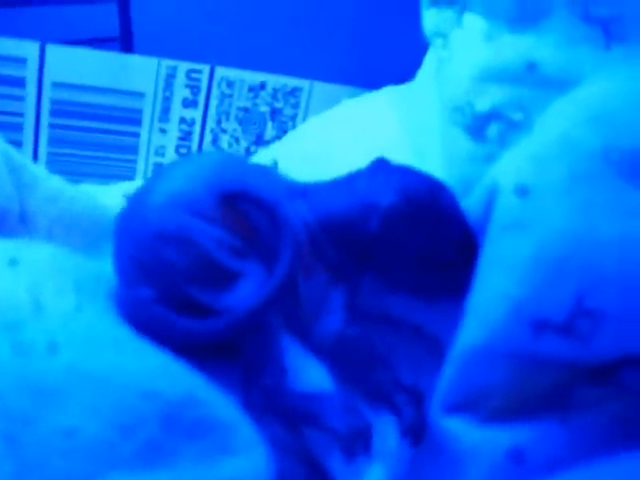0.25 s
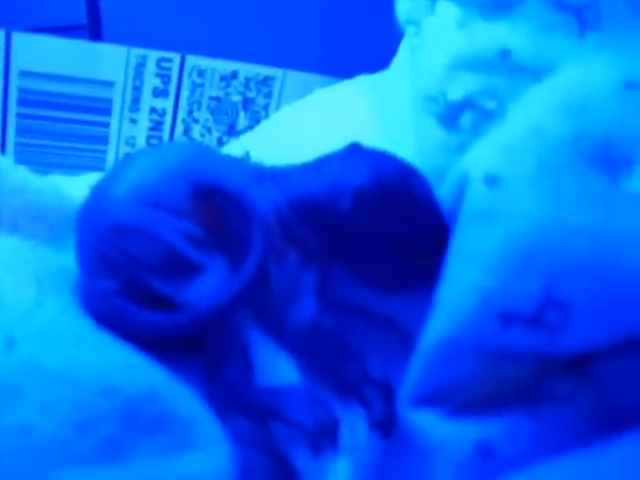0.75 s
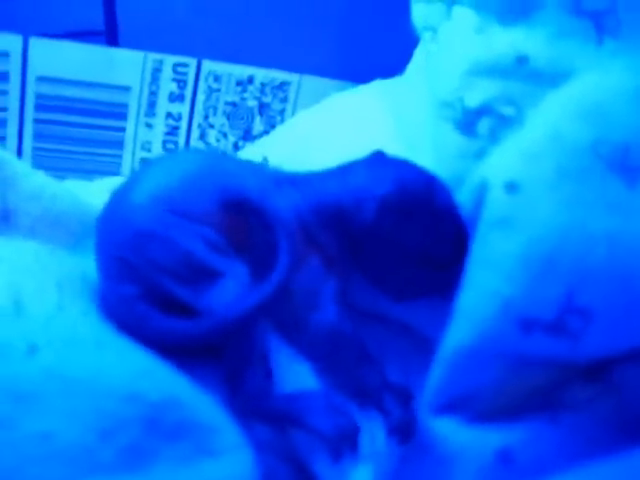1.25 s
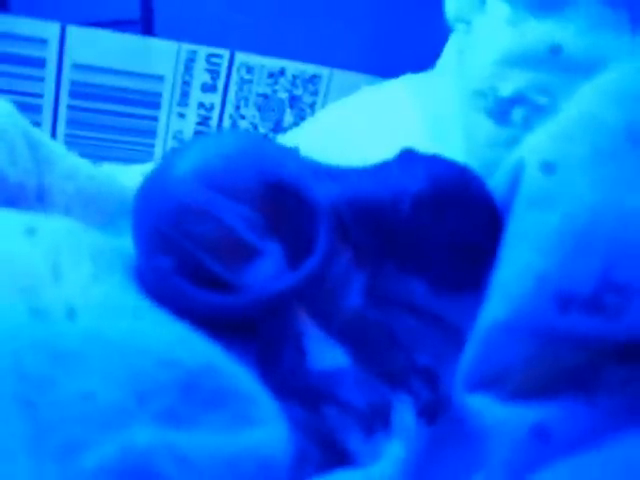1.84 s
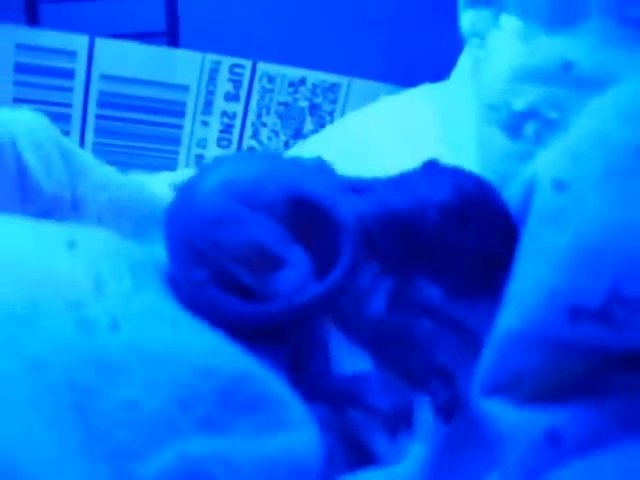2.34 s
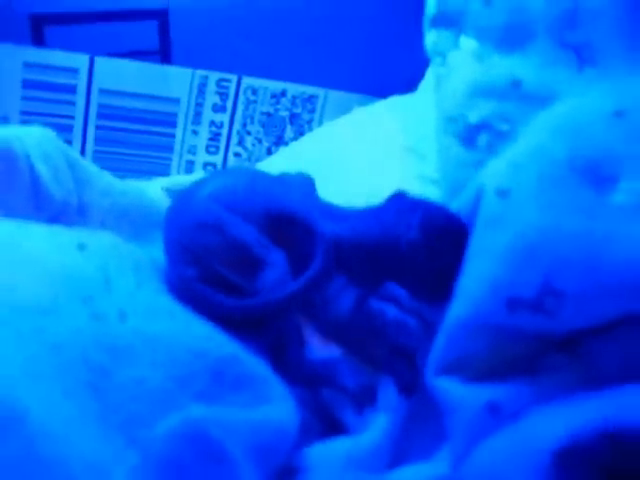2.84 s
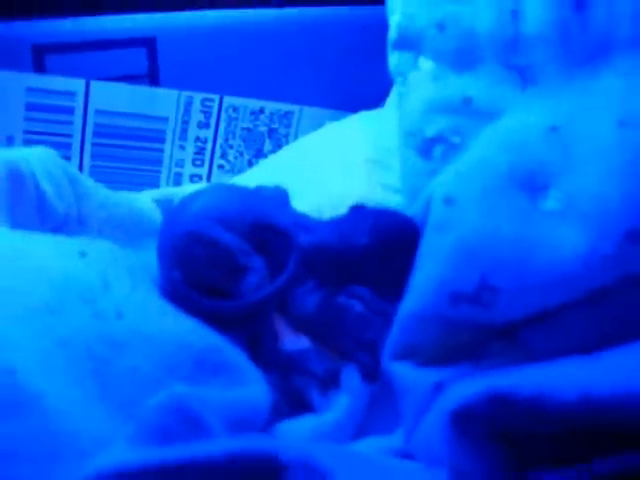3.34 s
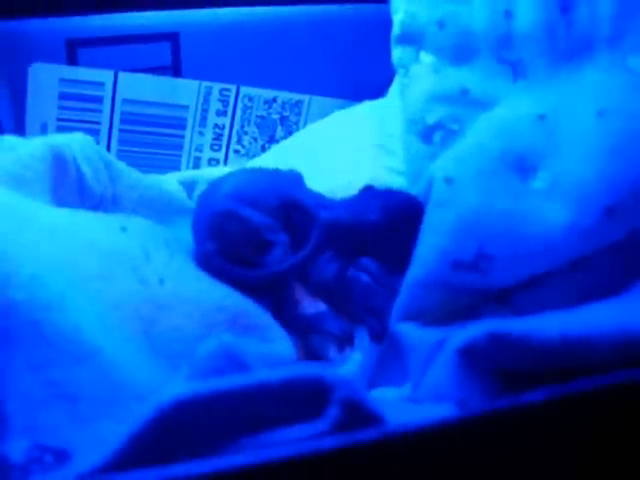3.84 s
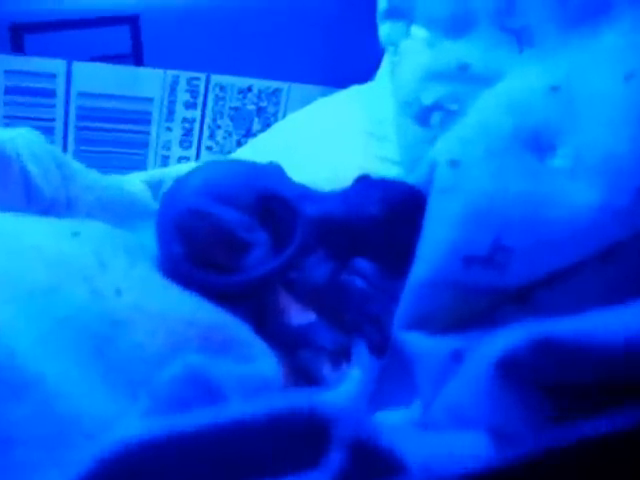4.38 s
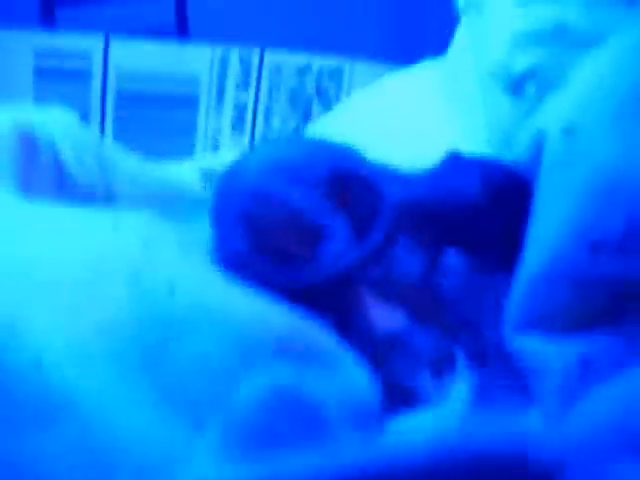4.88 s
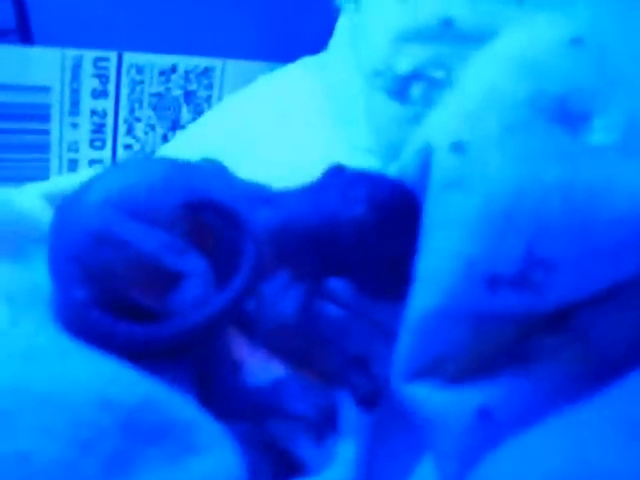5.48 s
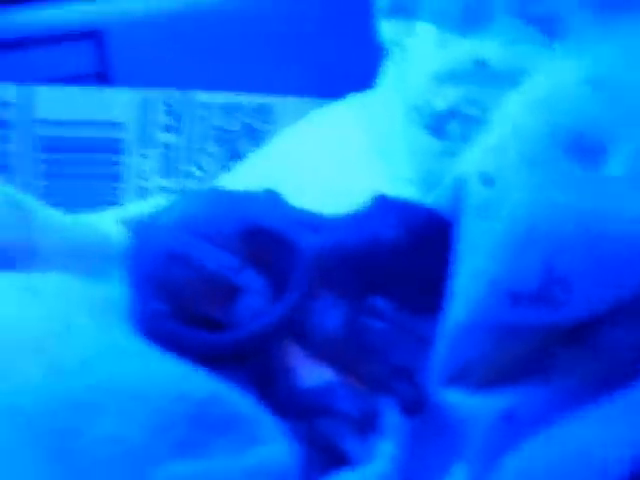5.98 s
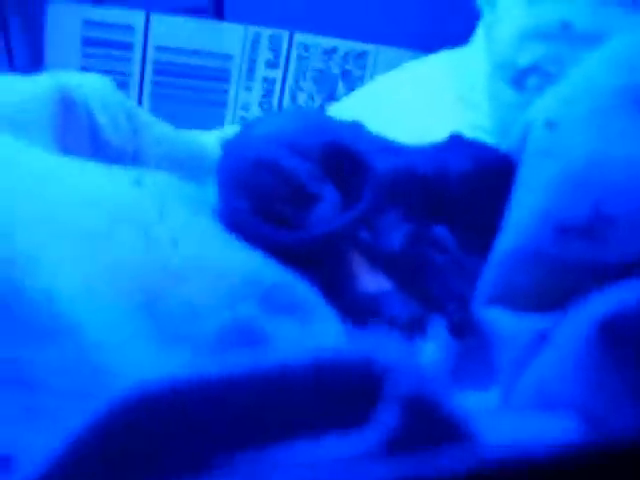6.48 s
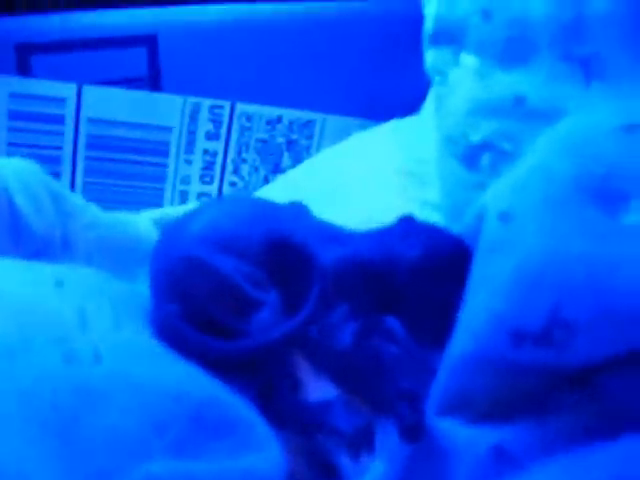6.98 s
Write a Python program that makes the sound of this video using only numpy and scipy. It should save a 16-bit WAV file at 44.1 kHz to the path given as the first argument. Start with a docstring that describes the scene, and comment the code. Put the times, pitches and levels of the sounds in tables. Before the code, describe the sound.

A baby squirrel squeaks close to the microphone in a small room with a short, faint reverberation. Twelve loud calls start at about 0.0, 0.6, 1.2, 1.8, 2.5, 3.1, 3.7, 4.3, 4.9, 5.5, 6.1 and 6.75 seconds, the last ending at 7.0. Each is a piercing whistle around 4 to 5 kHz with bright overtones, lasting 0.16 seconds at first and about 0.25 later. Pitch arches upward, then plunges at the end; a noisy rasp edges the onset and the fading tail. Later squeaks sit a little lower and flatter, with rougher endings. Small mouth ticks precede the squeaks at 0.6, 1.8 and 3.1 seconds; a soft low bump comes at 4.9, and nearly inaudible stirs at 4.1, 4.7 and 5.3. A quiet, steady appliance hum, low rumble and very faint electrical whine continue throughout.

```python
"""A baby squirrel lying in its bedding squeaks twelve times, close to one microphone in a small room.
Each squeak is a whistle near 4.5 kHz, built from four partials, that arches and drops away.
Noise and undertones between the partials make the voice rasp as it starts and as it gives out.
Bursts of filtered noise make small mouth ticks before some squeaks, and faint stirs and a bump;
behind them an appliance hums in sines and rumbles in noise."""
import sys
import numpy as np
from scipy import signal
from scipy.fft import rfft, irfft
from scipy.io import wavfile
from scipy.ndimage import uniform_filter1d, minimum_filter1d

SR = 44100
rng = np.random.default_rng(int(sys.argv[2]) if len(sys.argv) > 2 else 0)


def transcribe(signal):
    """Save signal, clipped to [-1, 1], as a 16-bit WAV file at the path in sys.argv[1]."""
    frames = np.atleast_2d(signal).T
    limited = np.clip(frames, -1, 1)
    pcm = np.round(limited * 32767).astype(np.int16)
    wavfile.write(sys.argv[1], SR, pcm)


N = 318402
TIME = np.arange(N) / SR

# The squeaks: [start t/s, end t/s, fundamental trim level/dB, swell level/dB, mouth tuning/ratio,
#   final pitch drop/fraction, opening rasp length t/s, opening rasp level/dB,
#   closing rasp length t/s, closing rasp level/dB, closing undertone level/dB]
SQUEAKS = [(0.025, 0.188, 0.5, -0.5, 1.006, 0.17, 0.0027, -17, .03, -49.5, -51),
           (.611, 0.794, -2, -1, 1.011, 0.23, 0.0047, -21, .03, -39, -49),
           (1.201, 1.407, -3, -3, 1, .38, 0.0049, -21, .049, -38, -34.5),
           (1.798, 2.02, -0.5, 1, 0.98, 0.4, 0.0073, -29, 0.06, -37.5, -33),
           (2.476, 2.689, -2.5, -3, 1.011, .38, 0.014, -19, 0.097, -30, -43),
           (3.082, 3.314, -1, -5.5, 0.99, 0.46, .011, -37, 0.059, -35.5, -19.5),
           (3.679, 3.914, -1, 3.5, 1.001, 0.22, .013, -26, 0.081, -33, -30),
           (4.304, 4.537, 2.5, 14.5, 1.027, 0.42, 0.0089, -30.5, 0.06, -31.5, -19.5),
           (4.925, 5.164, 2, 7, 1.002, 0.33, 0.024, -23.5, .051, -37, -7.5),
           (5.532, 5.777, 1, 21, 1, .47, 0.017, -24, 0.05, -29.5, -18),
           (6.137, 6.392, 2.5, 7.5, 0.98, 0.38, .034, -26, 0.063, -26.5, -14.5),
           (6.751, 7.001, 2.5, 11.5, 0.94, 0.34, 0.025, -22, .055, -28.5, -18)]
# Pitch arch of each squeak, before its final drop: [t/s, f/Hz, octave trim level/dB]
PITCH_ARCHES = [
    [(0.029, 4850, 9.5), (0.033, 4684, 6), (0.059, 4820, 8.0), (0.081, 4780, -3), (0.085, 4670, -13.5),
     (0.091, 4640, -4), (0.109, 4854, 6.5), (0.151, 4650, 3.5), (0.167, 4530, 1.0)],
    [(0.615, 4360, 1.5), (0.619, 4510, 3.5), (0.629, 4200, 7), (0.641, 4400, 10), (0.645, 4772, -5),
     (0.683, 5140, 2), (0.725, 4990, 7), (0.757, 4747, -1), (0.771, 4600, -0.5)],
    [(1.209, 4450, -2.5), (1.217, 4440, 4), (1.227, 4360, 6), (1.231, 4670, 5), (1.239, 4650, 7),
     (1.265, 5065, -6), (1.323, 5138, 5), (1.373, 4700, -4.5), (1.383, 4410, 1.5)],
    [(1.8, 4180, -5), (1.81, 3860, 0.5), (1.822, 4340, -1.5), (1.854, 4710, -0.5), (1.882, 4883, -14.5),
     (1.946, 4760, -18), (1.956, 4914, -0.5), (1.982, 4550, -3.5), (1.996, 4110, -1)],
    [(2.488, 3830, 9.5), (2.492, 4170, -0.5), (2.51, 4394, 7), (2.55, 5023, -3.5), (2.606, 4930, -6),
     (2.612, 4980, 7), (2.63, 4630, -3.5), (2.652, 4070, 1), (2.666, 3546, -1)],
    [(3.088, 3994, -3.5), (3.132, 4220, -13.5), (3.158, 4310, -9.0), (3.176, 4530, -1), (3.184, 4400, -0.5),
     (3.206, 4726, -7.5), (3.242, 4836, -7), (3.28, 4036, -6.0), (3.288, 3890, 0)],
    [(3.688, 4130, -7.5), (3.692, 4180, -4), (3.78, 4265, 1), (3.814, 4880, -6.5), (3.832, 4890, 4.5),
     (3.856, 4330, -8.0), (3.868, 4310, -9), (3.876, 4230, -1), (3.89, 3630, -1)],
    [(4.312, 4055, -0.5), (4.342, 4254, -3), (4.374, 4246, -4.5), (4.424, 4400, -1), (4.438, 4370, -6.5),
     (4.462, 4906, -1.5), (4.482, 4310, -12.5), (4.504, 4200, -5), (4.514, 3900, 2.5)],
    [(4.946, 4030, 13), (4.962, 4110, -0.5), (5.022, 4217, -5.0), (5.05, 4780, 8.5), (5.068, 4374, 0),
     (5.088, 4614, -9), (5.1, 4103, -1), (5.124, 4115, 3.0), (5.14, 3716, 3.5)],
    [(5.552, 4190, -6.0), (5.612, 4200, 6.5), (5.648, 4490, 3.5), (5.66, 4700, 0), (5.698, 4470, -4),
     (5.712, 4070, -9.5), (5.73, 4273, -1), (5.744, 4040, 2.5), (5.754, 3695, 3.5)],
    [(6.16, 4188, -3), (6.166, 4229, -7.5), (6.174, 4124, -0.5), (6.246, 4313, -0.5), (6.258, 4452, 1.5),
     (6.332, 4255, -2.5), (6.348, 4090, 5), (6.356, 4020, 3.5), (6.368, 3710, 6.5)],
    [(6.768, 3940, 5), (6.776, 4100, -3.5), (6.784, 4053, 2.5), (6.832, 4195, 2.5), (6.866, 4336, 13),
     (6.898, 4323, 13), (6.942, 4124, -4.5), (6.95, 4220, -1.5), (6.978, 3732, 7)],
]
# How loud the fundamental grows as it crosses the resonances of the mouth: [f/Hz, level/dB]
MOUTH_FUNDAMENTAL = [(2300, -34), (3600, -31), (4000, -25.5), (4250, -23), (4430, -24.5), (4630, -9),
                     (4820, -6.5), (4950, -12), (5100, -5.5)]
# The same for the octave: [f/Hz, level/dB]
MOUTH_OCTAVE = [(4600, -37), (6500, -32.5), (7500, -20), (8400, -21.5), (8720, -16.5), (9100, -19),
                (9500, -21.5), (9780, -23.5), (10050, -28), (10300, -22)]
# Moments when the voice doubles its period: [start t/s, length t/s, undertone level/dB]
DOUBLINGS = [(.105, 0.039, -36), (0.682, 0.082, -34.5), (1.317, 0.046, -30.5), (2.477, 0.017, -19),
             (4.939, .008, -21.5), (6.154, 0.019, -26), (6.765, 0.01, -18.5)]
# Resonances of throat and mouth that colour the rasp: [centre f/Hz, width f/Hz, level/dB]
THROAT_RESONANCES = [(2390, 1600, -16.5), (5800, 770, -3), (5340, 550, 3), (7600, 770, -5.5),
                     (8450, 1000, -3.5), (10100, 700, -9), (13500, 3000, -26)]
# Colour of the broad hiss riding on the voice: [f/Hz, relative level/dB per Hz]
HISS_COLOUR = [(300, -1.5), (1000, 2), (2500, 1.5), (5000, 2), (9000, 4.5), (12000, 2), (15500, 1.5)]
# Reverberation time of the room: [f/Hz, t60 t/s]
ROOM_T60 = [(500, 0.33), (4500, 0.22), (8500, 0.21), (15000, 0.16)]
# Small ticks of the mouth before some squeaks, and faint stirs and a bump:
#   [t/s, level/dB, centre f/Hz, length t/s]
TICKS_AND_STIRS = [(0.605, -27, 5590, 0.00073), (1.791, -34, 5300, 0.0014), (3.085, -30.5, 3667, 0.0077),
                   (4.096, -57, 7910, 0.004), (4.705, -56.5, 8000, 0.0042), (4.889, -30.5, 145, 0.015),
                   (4.892, -48.5, 1300, 0.025), (5.328, -57, 8800, 0.0065)]
# Appliance hum and a thin electrical whine: [f/Hz, level/dB]
HUM_TONES = [(59.2, -46.5), (166.9, -43.5), (242.2, -59.5), (317.6, -52.5), (8000, -78.5), (8032, -71)]
# Colour of the background air and rumble: [f/Hz, relative level/dB per Hz]
RUMBLE_COLOUR = [(12, -23), (20, -3), (40, -3), (60, -3), (86, -12.5), (130, -7.5), (200, -12.5),
                 (330, -13.5), (540, -21.5), (720, -27), (1220, -30), (4540, -42), (8180, -46),
                 (16000, -50)]

DROP_S, DROP_POWER = 0.03, 3   # the final fall in pitch
SWELL_S, CATCH_POWER = .065, 3.0   # how the fundamental settles, how the clean tone catches
RASP_CYCLES = 4   # in a rasp the folds repeat only every few cycles
RASP_SAG_DB = 5.0   # the closing rasp weakens by this much as the air runs out
OPENING_UNDERTONE_DB = -12.5   # relative to the opening rasp
# the closing rasp loses its undertones and stops just before the voice
UNDERTONE_FADE_S, RASP_CLEARS_S = 0.011, 0.0091
RUMBLE_DB = -40
CUTOFF_HZ = 15500


def squirrel(rasp_jitter=0.28, hiss_db=-25, effort_power=.6, grain_db=4.0):
    """Vibrating folds: a clean whistle that turns jittery and noisy where the voice breaks."""
    pitch, first, octave = voice_controls()
    pressure = pressure_rise()
    turbulence, undertone, breaking = voice_breaks()
    turbulence = pressure * turbulence
    doubling = sum(from_db(db) * gate(start, start + length, edge=.0026)
                   for start, length, db in DOUBLINGS)

    waver = .003 * drift(90)
    jitter = rasp_jitter * turbulence * drift(400)
    pitch = pitch * (1 + waver + jitter)
    phase = 2 * np.pi * np.cumsum(pitch) / SR

    # the airflow varies less than the loudness, which swells wherever a partial meets a resonance
    loudness = np.sqrt(first ** 2 + octave ** 2 + turbulence ** 2)
    effort = 0.49 * (loudness / 0.28) ** effort_power

    clean = whistle(phase, pitch, first, octave, effort, breaking)
    rasp = turbulence * throat_noise() * from_db(grain_db * drift(500))
    hiss = effort * from_db(hiss_db) * noise(HISS_COLOUR)
    rasp_lines = undertones(phase, pitch, undertone, count=RASP_CYCLES, slip=.04)
    doubled_lines = undertones(phase, pitch, doubling, count=2, slip=0.04)
    return clean + pressure * (rasp_lines + doubled_lines) + rasp + hiss


def voice_controls():
    """Pitch arches and drops; the first two partials swell as they cross the resonances of the mouth."""
    pitch = np.full(N, PITCH_ARCHES[0][0][1], float)
    first, octave = np.zeros((2, N))
    for squeak, arch in zip(SQUEAKS, PITCH_ARCHES):
        start, end, first_db, swell_db, mouth, drop, opening_s, *_ = squeak
        voiced = gate(start, end, edge=.002)
        on = voiced > 0
        t = TIME[on]
        age = np.maximum(t - start, 0)

        arch_s, arch_hz, octave_db = np.transpose(arch)
        dropping = np.clip(1 - (end - t) / DROP_S, 0, 1)
        hz = np.interp(t, arch_s, arch_hz) * (1 - drop * dropping ** DROP_POWER)

        # the clean tone catches as the opening rasp ends
        caught = voiced[on] * np.minimum(age / opening_s, 1) ** CATCH_POWER
        settling_db = first_db - swell_db * np.exp(-age / SWELL_S)
        pitch[on] = hz
        # the mouth is retuned a little in each squeak
        first[on] = caught * from_db(settling_db + at_hz(MOUTH_FUNDAMENTAL, hz / mouth))
        octave_level_db = np.interp(t, arch_s, octave_db) + at_hz(MOUTH_OCTAVE, 2 * hz / mouth)
        octave[on] = caught * from_db(octave_level_db)
    return pitch, first, octave


def whistle(phase, pitch, first, octave, effort, breaking,
            third_db=-27.0, fourth_db=-40, flutter_db=2.1, stutter_db=0.5):
    """Four partials flutter separately and stutter as the voice breaks up; the upper two follow effort."""
    strengths = [first, octave, effort * from_db(third_db), effort * from_db(fourth_db)]
    out = np.zeros(N)
    for k, strength in enumerate(strengths, 1):
        stutter = stutter_db * breaking * np.abs(drift(76))
        flutter = from_db(flutter_db * drift(100) - stutter)
        below_nyquist = k * pitch < SR / 2
        out += strength * flutter * np.sin(k * phase) * below_nyquist
    return np.sqrt(2) * out


def voice_breaks():
    """Each squeak rasps as it opens and closes: turbulence, undertone strength, and breaking-up of the tone."""
    turbulence, undertone, breaking = np.zeros((3, N))
    for start, end, *_, opening_s, opening_db, closing_s, closing_db, undertone_db in SQUEAKS:
        opening = from_db(opening_db) * gate(start - .001, start + opening_s, edge=0.002)
        closing = gate(end - closing_s, end - RASP_CLEARS_S, edge=.005)
        since = np.clip(TIME - end + closing_s, 0, 1)
        fade = np.exp(-since / UNDERTONE_FADE_S)
        air = from_db(RASP_SAG_DB * (.5 - np.minimum(since / closing_s, 1)))

        turbulence += opening + from_db(closing_db) * closing * air
        undertone += from_db(OPENING_UNDERTONE_DB) * opening
        undertone += from_db(undertone_db) * closing * fade
        breaking += closing
    return turbulence, undertone, breaking


def pressure_rise(rise_s=.004):
    """Air pressure builds up over the first milliseconds of each squeak."""
    starts = np.array([start for start, *_ in SQUEAKS]) - .003   # just ahead of the tone
    latest = np.maximum(np.searchsorted(starts, TIME) - 1, 0)
    return 1 - np.exp(-np.maximum(TIME - starts[latest], 0) / rise_s)


def undertones(phase, pitch, strength, count, slip, unevenness_db=4.5, sideband_fall=2.3):
    """Folds that repeat only every count cycles put lines between the partials, shaped by the throat."""
    out, on = np.zeros(N), strength > 0
    multiples = np.array([[k / count] for k in range(1, 4 * count) if k % count])
    hz = multiples * pitch[on]

    # the lines next to a partial are the strongest
    steps_away = count * np.abs(multiples - np.round(multiples))
    gains = throat_gain(hz) * (hz < SR / 2) / steps_away ** sideband_fall
    gains = gains / np.linalg.norm(gains, axis=0)

    # the pattern slips, which smears the lines into a rasp
    first_phase = 2 * np.pi * rng.random(multiples.shape)
    slips = first_phase + slip * np.cumsum(rng.standard_normal(hz.shape), axis=1)
    lines = gains * np.sin(multiples * phase[on] + slips)
    out[on] = np.sqrt(2) * strength[on] * lines.sum(axis=0)
    return out * from_db(unevenness_db * drift(150))


def throat_noise():
    """Turbulence coloured by the throat, rms 1."""
    hz = np.arange(N // 2 + 1) * SR / N
    return rms_one(irfft(rfft(rng.standard_normal(N)) * throat_gain(hz), N))


def throat_gain(hz):
    """The resonances add in power and fall away steeply between their peaks."""
    power = sum(from_db(db) ** 2 / (1 + ((hz - centre) / width) ** 2) ** 2
                for centre, width, db in THROAT_RESONANCES)
    return np.sqrt(power)


def room(x, wet_db=-24, first_echo_s=0.0034):
    """A diffuse tail, band by band, that dies sooner in the treble."""
    t, tail = TIME[:SR // 2], 0
    edges = np.geomspace(200, 18000, 10)
    for low, high in zip(edges, edges[1:]):
        band = signal.butter(2, [low, high], "band", fs=SR, output="sos")
        diffuse = signal.sosfilt(band, rng.standard_normal(len(t)))
        t60 = at_hz(ROOM_T60, np.sqrt(low * high))
        tail = tail + diffuse * np.exp(-np.log(1000) * t / t60)
    tail = tail * (t > first_echo_s)
    return from_db(wet_db) * signal.fftconvolve(x, tail / np.linalg.norm(tail))[:N]


def ticks_and_stirs():
    """Small mouth ticks, faint stirs and a bump: brief swells of noise about an octave wide."""
    out = np.zeros(N)
    for s, db, hz, length in TICKS_AND_STIRS:
        band = signal.butter(2, [hz / 1.5, hz * 1.5], "band", fs=SR, output="sos")
        burst = rms_one(signal.sosfilt(band, rng.standard_normal(N)))
        out += from_db(db) * np.exp(-((TIME - s) / length) ** 2) * burst
    return out


def appliance(waver_db=1.5, phase_wander=0.081):
    """Slightly unsteady motor tones over a rumble of moving air."""
    hum = np.zeros(N)
    for hz, db in HUM_TONES:
        level = from_db(db + waver_db * drift(4.6))
        hum += level * np.sin(2 * np.pi * hz * TIME + phase_wander * drift(3.1))   # wander in radians
    return np.sqrt(2) * hum + from_db(RUMBLE_DB) * noise(RUMBLE_COLOUR)


def from_db(db):
    """Decibels to gain."""
    return 10 ** (np.asarray(db) / 20)


def rms_one(x):
    """Scale to unit rms."""
    return x / np.sqrt(np.mean(x ** 2) + 1e-20)


def at_hz(points, hz):
    """Read a spectrum on a log-frequency axis."""
    freqs, values = np.transpose(points)
    return np.interp(np.log(np.maximum(hz, 1)), np.log(freqs), values)


def noise(spectrum):
    """Noise of a given colour, rms 1."""
    hz = np.arange(N // 2 + 1) * SR / N
    return rms_one(irfft(rfft(rng.standard_normal(N)) * from_db(at_hz(spectrum, hz)), N))


def drift(rate):
    """Smooth random wandering at about rate per second, spread 1."""
    hz = np.arange(N // 2 + 1) * SR / N
    return rms_one(irfft(rfft(rng.standard_normal(N)) / (1 + (hz / rate) ** 2), N))


def gate(start, end, edge):
    """One between start and end, with short ramps."""
    return np.clip(np.minimum(TIME - start, end - TIME) / edge + .5, 0, 1)


def limiter(x, ceiling=.67):
    """A fast limiter turns down crests above the ceiling, with its gain smoothed over milliseconds."""
    needed = np.minimum(1, ceiling / (np.abs(x).max(axis=0) + 1e-9))
    held = minimum_filter1d(needed, size=177)   # sizes in samples
    return x * uniform_filter1d(held, size=133)


def scene():
    """Everything reaches one microphone, the same in both channels."""
    voice = squirrel()
    mono = voice + room(voice) + ticks_and_stirs() + appliance()
    return np.array([mono, mono])


def record(dry):
    """Peaks are held down and the top is cut steeply."""
    steep_cut = signal.ellip(12, .1, 80, CUTOFF_HZ, fs=SR, output="sos")
    return signal.sosfilt(steep_cut, limiter(dry))


dry = scene()
out = record(dry)
transcribe(out)
```